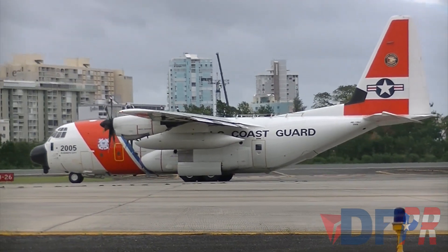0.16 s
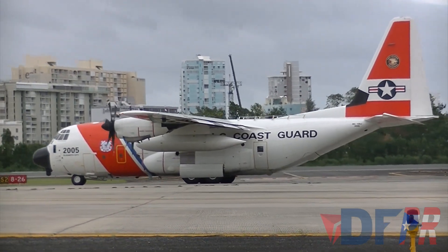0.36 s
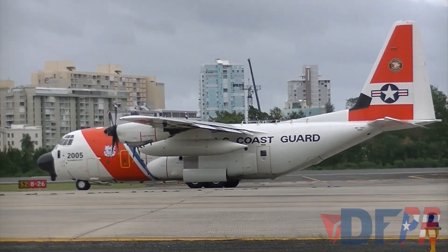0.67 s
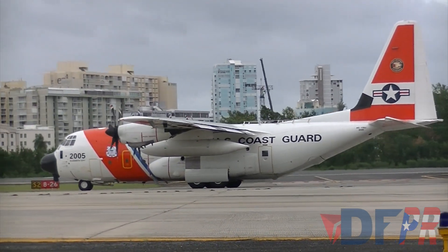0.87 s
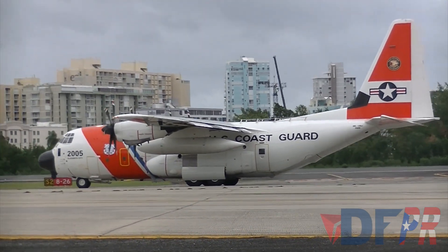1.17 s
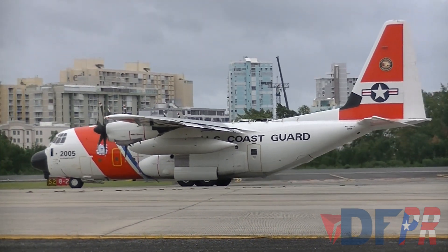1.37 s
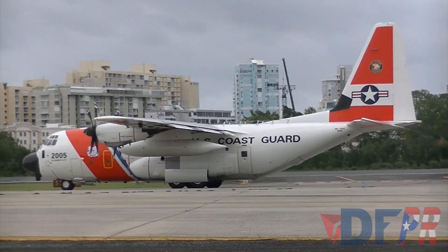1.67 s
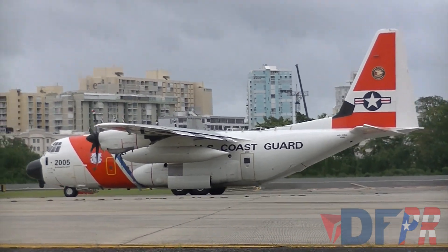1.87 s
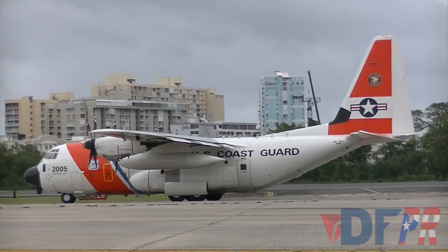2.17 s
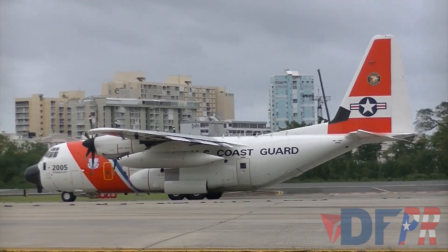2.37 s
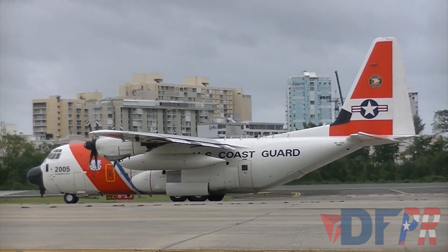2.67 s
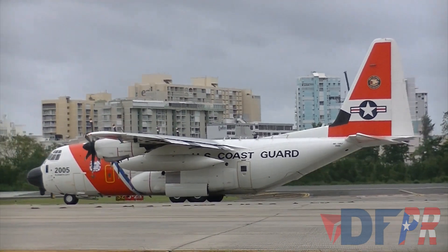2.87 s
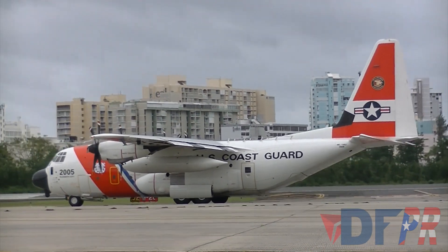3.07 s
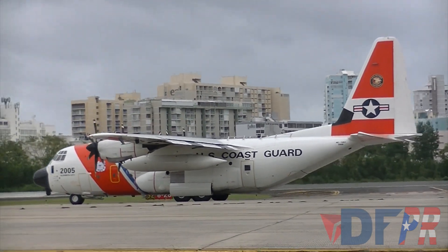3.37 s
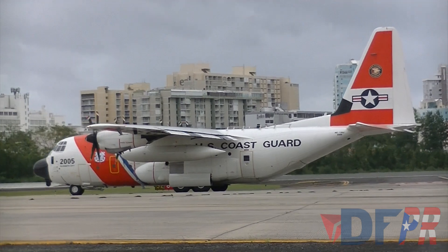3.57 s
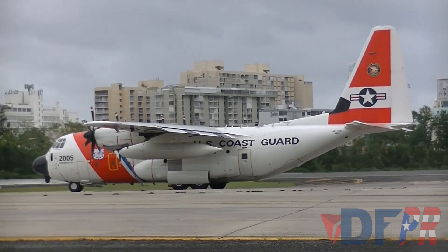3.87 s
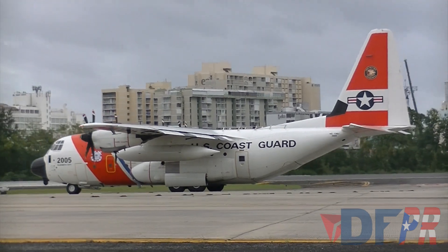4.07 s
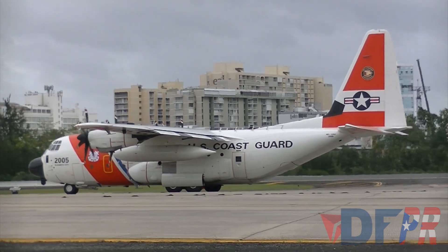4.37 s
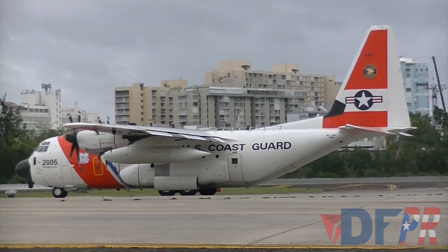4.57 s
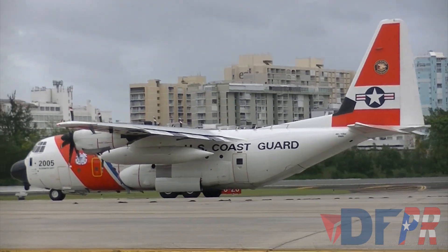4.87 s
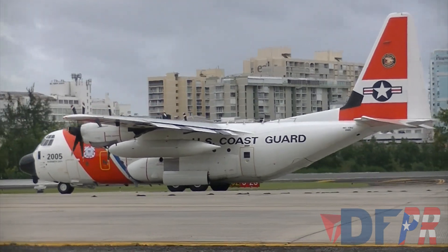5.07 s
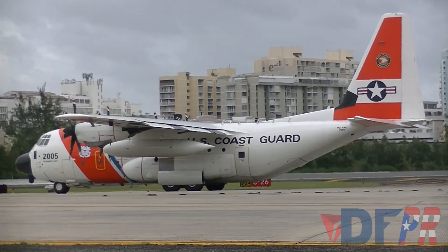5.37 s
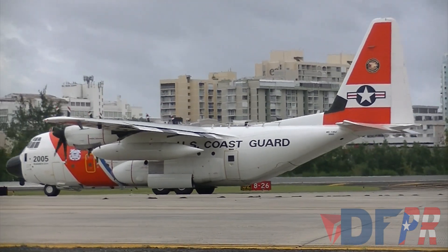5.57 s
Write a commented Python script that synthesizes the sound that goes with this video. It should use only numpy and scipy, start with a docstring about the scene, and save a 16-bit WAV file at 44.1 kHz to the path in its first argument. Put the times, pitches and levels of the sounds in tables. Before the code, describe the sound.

Continuous bright compressor noise, almost like singing air, comes from a taxiing turboprop. It opens with a hollow intake howl that soon recedes, then a faint breathy whistle swells around the middle. Low propeller blades beat softly underneath, slightly fuller past four seconds. Breeze rustles unevenly on open-air stereo microphones, with short soft gust buffets early and late; the engines never stop.

```python
"""A broad, airy compressor hiss and a hollow intake howl open the scene; the howl soon fades to faint swells.
A four-engine turboprop is taxiing slowly past across an open apron. Its compressors sing as bands of
filtered noise and a breathy whistle, over a noise roar from the exhausts. The propellers drone as low
churned noise with blade tones that beat together. Breeze rustles and a few gusts buffet the microphones."""
import sys
import numpy as np
from scipy import signal
from scipy.fft import rfft, irfft, next_fast_len
from scipy.io import wavfile

SR = 44100
rng = np.random.default_rng(int(sys.argv[2]) if len(sys.argv) > 2 else 0)


def log_audio(samples):
    """Write samples as a 16-bit WAV file to the path given in sys.argv[1]."""
    # one column per channel
    frames = np.atleast_2d(samples).T
    # limit to full scale, then quantise
    limited = np.clip(frames, -1, 1)
    pcm = np.round(limited * 32767).astype(np.int16)
    wavfile.write(sys.argv[1], SR, pcm)


N = 252245
TIME = np.arange(N) / SR   # seconds
BINS = np.maximum(np.arange(2 ** 17 + 1) * SR / 2 ** 18, 1)   # Hz, kept above 0 for logarithms

# strength of the breeze, as the level of its rustle: time_s, level_db
BREEZE_STRENGTH = [(0, -48), (.7, -41.5), (.97, -31), (1.7, -35), (1.95, -46), (2.65, -53), (3.15, -38),
                   (3.8, -46.5), (5.1, -38), (5.72, -53)]


def from_db(db):
    """Decibels to gain."""
    return 10 ** (np.asarray(db) / 20)


def in_time(rows):
    """The columns of a curve at every sample."""
    time_s, *columns = np.transpose(rows)
    return [np.interp(TIME, time_s, column) for column in columns]


def in_frequency(rows):
    """The columns of a spectrum at every bin, joined along a logarithmic frequency axis."""
    hz, *columns = np.transpose(rows)
    return [np.interp(np.log(BINS), np.log(hz), column) for column in columns]


def colour(rows):
    """Gain at every frequency."""
    return from_db(in_frequency(rows)[0])


def hump(centre_hz, width_hz):
    """A rounded band, its width taken at half power."""
    return 2 ** (-2 * ((BINS - centre_hz) / width_hz) ** 2)


def bell(centre_s, length_s):
    """A smooth swell of height 1 around a moment; the length is its standard deviation."""
    return np.exp(-.5 * ((TIME - centre_s) / length_s) ** 2)


def drift(rate_hz):
    """Slow random movement with spread 1: noise through two equal one-pole lowpasses."""
    step = 40   # samples between points of the slow curve
    pole = np.exp(-2 * np.pi * rate_hz * step / SR)
    noise = rng.standard_normal(N // step + 2002)
    slow = signal.lfilter([1], [1, -2 * pole, pole * pole], noise)[2000:]   # skip the filter's start
    return np.interp(np.arange(N) / step, np.arange(len(slow)), slow / slow.std())


def microphone_pair():
    """Common and opposed sound in each channel; the average of the two channels has unit power."""
    # stereo image: frequency_hz, left-right likeness (0 to 1), left_minus_right_db, left_lead_radians
    stereo_image = [(100, 0.93, 1.5, 0.059), (380, 0.9, 2, 0.6), (900, 0.99, 0.5, -0.27),
                    (2320, 1, 0, -0.0011), (2980, 0.78, 1.5, 1.2), (3120, 0.96, -0.2, 0.57),
                    (4820, 0.94, -2, -0.05), (5450, 0.8, -3.5, -0.19), (5760, 0.27, -8.5, 0.59),
                    (6560, 0.2, 4, -2.7), (7650, 0.56, 7, 0.88), (9300, 0.72, -2, 1.07),
                    (12000, 0.73, -0.4, 0.14), (15000, 0.57, -1, 0.01)]
    alike, balance_db, lead = in_frequency(stereo_image)
    alike = np.clip(alike, 0, .995)
    halves = [.5, -.5]   # split each difference evenly between left and right
    ports = from_db(np.outer(halves, balance_db)) * np.exp(1j * np.outer(halves, lead))
    common = ports * np.sqrt(1 + alike)
    opposed = ports * np.sqrt(1 - alike) * [[1], [-1]]
    centre = np.hypot(abs(common.mean(0)), abs(opposed.mean(0)))
    return common / centre, opposed / centre


def turbulence(gain, pair):
    """Stereo noise of the given colour, shaped in the frequency domain."""
    common, opposed = pair
    a, b = rfft(rng.standard_normal((2, 2 * len(BINS) - 2)))
    return irfft(gain * (common * a + opposed * b))[:, :N]


def unit_in_band(gain, band_hz):
    """Scale a colour so that its noise has rms 1 inside the band."""
    low, high = band_hz
    return gain / np.sqrt(np.mean(gain ** 2 * (BINS > low) * (BINS < high)))


def shimmering(gain, pair, edges_hz, shimmer_db):
    """Noise heard through hot moving air: each region of the spectrum swells and fades on its own."""
    bounds = [0, *edges_hz, SR]
    total = 0
    for low, high in zip(bounds, bounds[1:]):
        region = gain * (BINS >= low) * (BINS < high)
        total = total + turbulence(region, pair) * from_db(shimmer_db * drift(4.6))
    return total


def blade_phases(blade_hz=100.14, wander=0.00477):
    """Blade-passing phase of each propeller; the governors let the speeds wander."""
    # idle speed of each engine, slightly apart: share of the common blade rate
    idle_speeds = [.984, .993, 1.008, 1.013]
    phases = []
    for speed in idle_speeds:
        rate_hz = blade_hz * speed * (1 + wander * drift(1.204))
        phases.append(2 * np.pi * (rng.random() + np.cumsum(rate_hz) / SR))
    return phases


def chop(phase, depth):
    """A swell each time a blade passes, at constant mean power."""
    return (1 + depth * np.cos(phase)) / np.sqrt(1 + depth ** 2 / 2)


def compressors(phases, pair, shimmer_db=0.68):
    """Broad singing bands over a hiss, their powers added and lightly chopped by a propeller."""
    # colour of the airy hiss: frequency_hz, relative level_db per Hz
    hiss_colour = [(2500, -44), (4200, 3), (5500, -12), (6050, 6.5), (6400, 0), (6800, 1.5), (7250, -2.5),
                   (7700, 0), (8100, -1), (8550, -7), (9350, -3), (10200, -8.5), (11000, -22.5),
                   (15000, -28.5)]
    # singing bands: centre_hz, width_hz, peak_db per Hz on the scale of the hiss
    singing_bands = [(2800, 190, 4.5), (3290, 174, 6.5), (3820, 170, 9), (4433, 356, 13.5), (4878, 450, 15),
                     (5310, 310, 8.5)]
    power = colour(hiss_colour) ** 2
    for centre_hz, width_hz, peak_db in singing_bands:
        power = power + (from_db(peak_db) * hump(centre_hz, width_hz)) ** 2
    gain = unit_in_band(np.sqrt(power), (4100, 10000))
    whine = shimmering(gain, pair, [3550, 4100, 4650, 5550, 6900, 8500], shimmer_db)
    return whine * chop(phases[3], depth=0.064) * from_db(0.65 * drift(27))


def whistle(pair, centre_hz=5758, width_hz=160, base_db=-12):
    """A compressor stage's tone, smeared by turbulence into a breathy band; it swells as the intakes turn."""
    # swells of the whistle: centre_s, length_s (standard deviation), extra_db
    whistle_swells = [(3.4, 0.51, 1.5), (3.78, 0.036, 5)]
    level_db = base_db   # against the compressor noise
    for centre_s, length_s, extra_db in whistle_swells:
        level_db = level_db + extra_db * bell(centre_s, length_s)
    band = turbulence(unit_in_band(hump(centre_hz, width_hz), (0, SR)), pair)
    return from_db(level_db) * band


def intake_howl(phases, pair, rest_hz=2150, faint_db=-40):
    """Intake noise that swells, slides with the viewing angle and is chopped by the blades ahead of it."""
    # colour of the howl before it slides: frequency_hz, relative level_db per Hz
    howl_colour = [(1000, -54), (1450, -14), (1800, -1.5), (2000, -2), (2300, 1), (2600, -3), (2850, -2),
                   (3100, -12.5), (3350, -1.5), (3700, -13), (4400, -45.5)]
    # swells of the howl: centre_s, length_s (standard deviation), level_db, centre_hz
    howl_swells = [(.15, 0.74, -22, 2106), (.75, 0.34, -26, 2219), (1.95, 0.38, -27.5, 2304),
                   (4.43, 0.31, -26, 2702), (4.95, 0.056, -28, 2342)]
    power = from_db(faint_db) ** 2   # a faint howl remains between swells
    for centre_s, length_s, level_db, _ in howl_swells:
        power = power + (from_db(level_db) * bell(centre_s, length_s)) ** 2
    centre_hz, = in_time([(centre_s, hz) for centre_s, _, _, hz in howl_swells])
    band = turbulence(unit_in_band(colour(howl_colour), (0, SR)), pair)
    # shift the whole band by the same number of Hz
    slide = np.exp(2j * np.pi * np.cumsum(centre_hz - rest_hz) / SR)
    band = (signal.hilbert(band, next_fast_len(N))[:, :N] * slide).real
    return band * np.sqrt(power) * from_db(1.0 * drift(4)) * chop(phases[1], depth=0.28)


def exhaust(phases, pair, shimmer_db=1.16):
    """The jet roar, pulsed lightly by the slipstream of a propeller."""
    # colour of the roar: frequency_hz, relative level_db per Hz
    roar_colour = [(30, -48), (100, -44), (450, -10.5), (720, -6.5), (860, -5.5), (1030, -1.5),
                   (1250, -3.5), (1550, -1.5), (1900, 1), (2600, 2), (3100, -2.5), (4000, -2), (6000, -17),
                   (12000, -53)]
    gain = unit_in_band(colour(roar_colour), (700, 1500))
    roar = shimmering(gain, pair, [900, 1350, 1800, 2300, 2800], shimmer_db)
    return roar * chop(phases[2], depth=0.12) * from_db(.47 * drift(27))


def propellers(phases, pair, lumpy_db=2.0, waver_db=4.0, left_db=1.7):
    """Churned air, and blade tones that beat between the four propellers."""
    # colour of the churned air: frequency_hz, relative level_db per Hz
    wash_colour = [(20, -48), (55, -34), (100, -16), (150, -8), (200, -2.5), (300, 1.5), (400, 0.5),
                   (500, -2.5), (620, -7.5), (760, -20), (1500, -40), (4000, -70)]
    # blade-passing harmonics: multiple of the blade rate, peak_db against the wash before nearness
    blade_harmonics = [(1, -29), (2, -17), (3, -11), (4, -19.5), (5, -14)]
    wash = turbulence(unit_in_band(colour(wash_colour), (120, 600)), pair)
    wash = wash * chop(phases[1], depth=0.14) * from_db(lumpy_db * drift(31) - 0.77)
    tones = 0
    for phase, nearness in zip(phases, [0.7, 0.45, 0.17, 0.54]):
        inflow = nearness * from_db(waver_db * drift(6.5))   # uneven inflow loads the blades unevenly
        for multiple, peak_db in blade_harmonics:
            tone = np.sin(round(multiple) * phase + 2 * np.pi * rng.random())
            tones = tones + inflow * from_db(peak_db) * tone
    return wash + tones * from_db([[left_db], [-left_db]])   # tones lean left


def gusts(lag_s=0):
    """Joint strength of the gusts, as a gain."""
    # gusts on the microphones: centre_s, length_s (standard deviation), level_db
    gust_swells = [(1.028, 0.0051, -23), (1.075, 0.016, -23.5), (1.194, 0.015, -26.5),
                   (4.734, 0.021, -23.5), (5.03, .025, -29.5)]
    return sum(from_db(level_db) * bell(centre_s + lag_s, length_s)
               for centre_s, length_s, level_db in gust_swells)


def wind(pair, lumpy_db=2.5, low_hz=170, high_hz=420):
    """Short, lumpy gust buffets: noise through a bandpass that leaves out the deep bass."""
    eddies = turbulence(1, pair) * from_db(lumpy_db * drift(48))
    band = signal.butter(3, [low_hz, high_hz], "band", fs=SR, output="sos")
    buffet = signal.sosfilt(band, eddies)
    return gusts() * buffet / buffet.std()


def breeze(lumpy_db=5.5, low_hz=250, dull_hz=450, top_hz=4000):
    """Eddies rustle at each microphone separately, as filtered noise in quick uneven puffs."""
    puffs = from_db(lumpy_db * np.array([drift(44), drift(40)]))
    rustle = rng.standard_normal((2, N)) * puffs
    for order, cutoff_hz, kind in [(3, low_hz, "high"), (1, dull_hz, "low"), (2, top_hz, "low")]:
        rustle = signal.sosfilt(signal.butter(order, cutoff_hz, kind, fs=SR, output="sos"), rustle)
    return from_db(in_time(BREEZE_STRENGTH)[0]) * rustle / rustle.std()


def treble_fade(blowing, breeze_fade_db=2, gust_fade_db=7, lag_s=0.018, full_gust_db=-21):
    """Fade in dB: breeze weakens the compressors, and a gust in it briefly scatters the treble."""
    gust = gusts(lag_s) / from_db(full_gust_db)   # 1 is a full-strength gust
    return blowing * (breeze_fade_db + gust_fade_db * gust)


def scene(wash_waver_db=0.6, whine_waver_db=0.21):
    """The engines in the open; the wind lifts their drone and scatters their treble."""
    # compressor noise, beamed unevenly as the engines pass: time_s, level_db before fade and waver
    compressor_beam = [(0, -20.2), (.4, -21.5), (1.6, -20.5), (2.55, -19), (3.2, -19.4), (4.48, -18.9),
                       (4.63, -20.5), (5.72, -21.2)]
    # exhaust roar, rising unevenly as the tailpipes turn into view: time_s, level_db
    exhaust_beam = [(0, -34.8), (.5, -33.4), (2.2, -35.2), (2.55, -33), (3.0, -34), (3.45, -33),
                    (4.4, -33.5), (5.2, -33.5), (5.72, -32)]
    pair, phases = microphone_pair(), blade_phases()
    blowing = from_db(in_time(BREEZE_STRENGTH)[0] + 32)   # 1 is a full breeze, at -32 dB
    fade_db = treble_fade(blowing)

    whine_db = in_time(compressor_beam)[0] - fade_db + whine_waver_db * drift(3.7)
    whine = from_db(whine_db) * (compressors(phases, pair) + whistle(pair))
    howl = from_db(-0.69 * fade_db) * intake_howl(phases, pair)   # the lower howl fades less
    roar = from_db(in_time(exhaust_beam)[0]) * exhaust(phases, pair)

    abeam = bell(4.38, .75)   # the propellers are abeam around this moment
    wash_db = -33.7 + 2.5 * abeam + 3.2 * blowing   # the breeze carries the wash over
    wash_db = wash_db + wash_waver_db * drift(3.3)
    drone = from_db(wash_db) * propellers(phases, pair)
    return whine + howl + roar + drone + wind(pair) + breeze()


def record(dry, cutoff_hz=15200):
    """A steep elliptic lowpass cuts the top."""
    lowpass = signal.ellip(10, .1, 90, cutoff_hz, fs=SR, output="sos")
    return signal.sosfilt(lowpass, dry)


dry = scene()
out = record(dry)
log_audio(out)
```